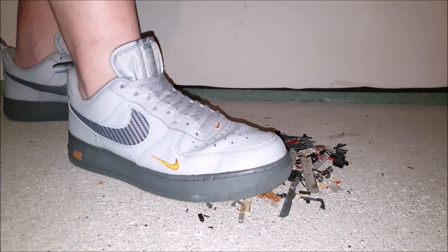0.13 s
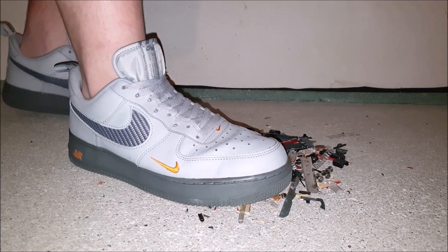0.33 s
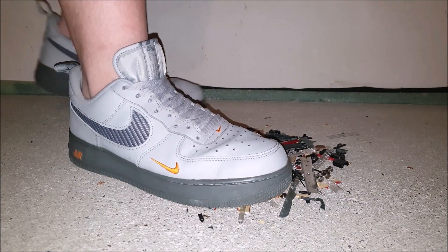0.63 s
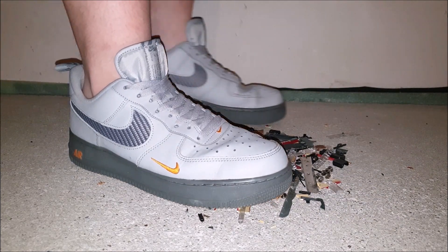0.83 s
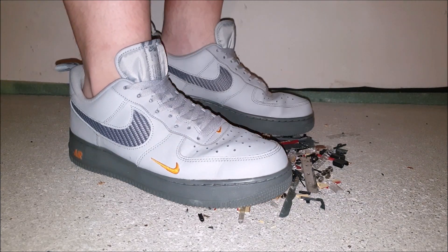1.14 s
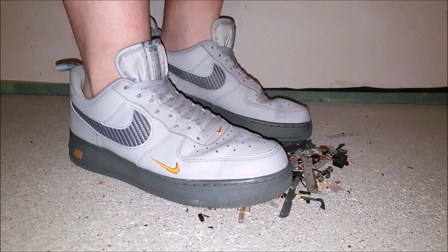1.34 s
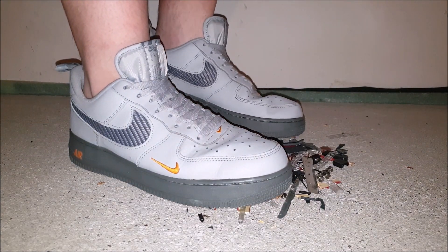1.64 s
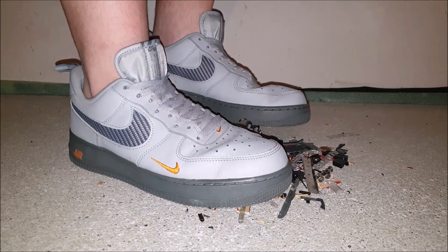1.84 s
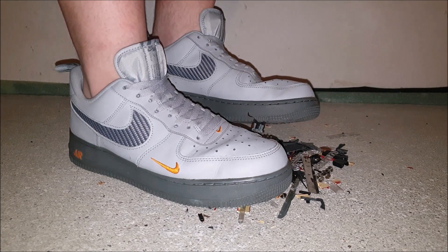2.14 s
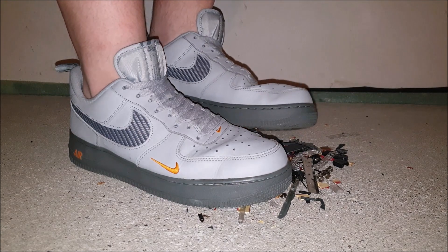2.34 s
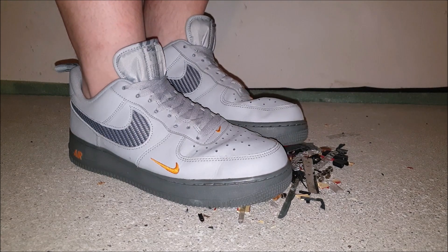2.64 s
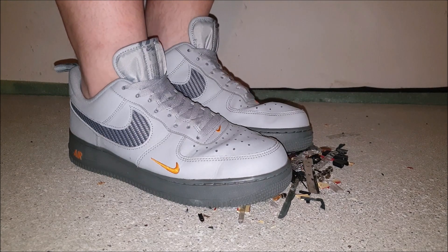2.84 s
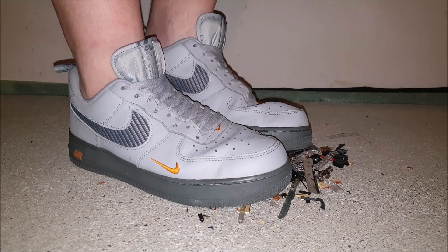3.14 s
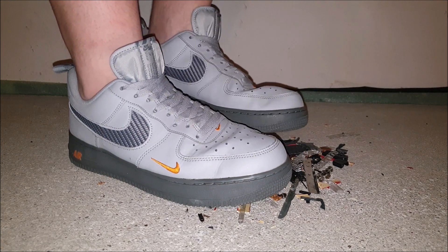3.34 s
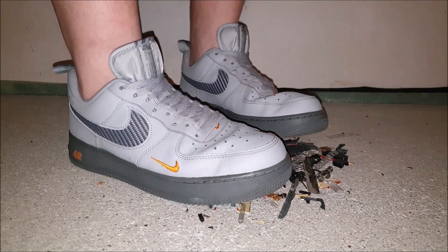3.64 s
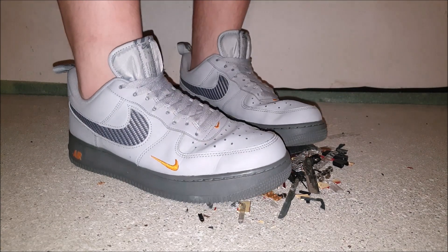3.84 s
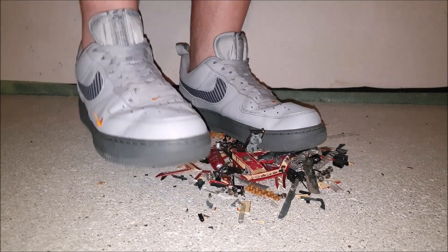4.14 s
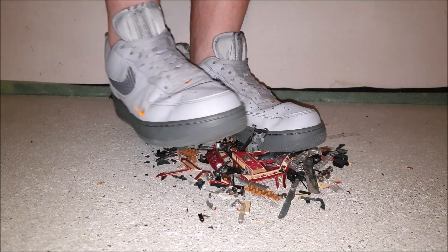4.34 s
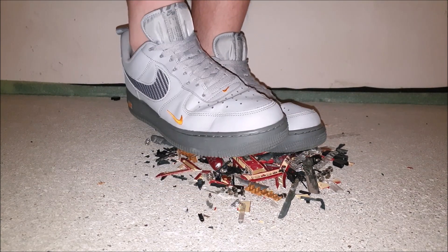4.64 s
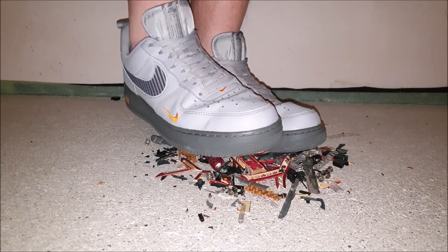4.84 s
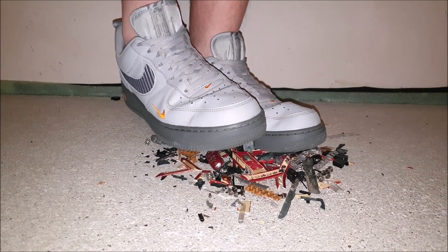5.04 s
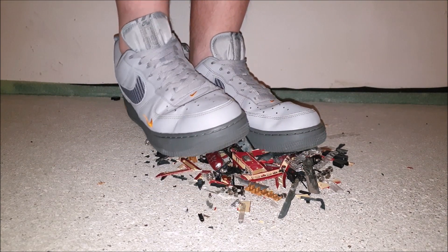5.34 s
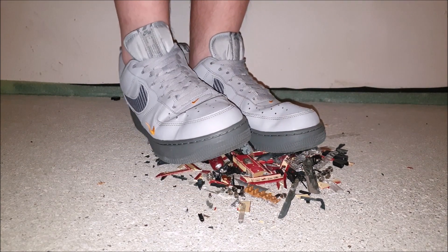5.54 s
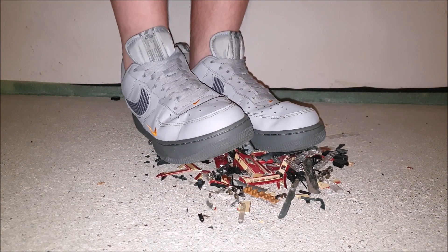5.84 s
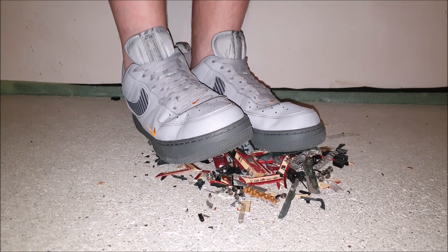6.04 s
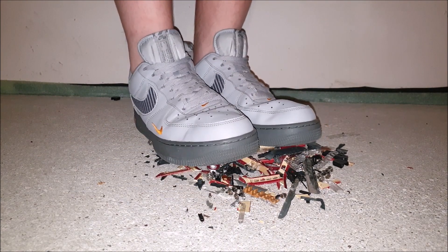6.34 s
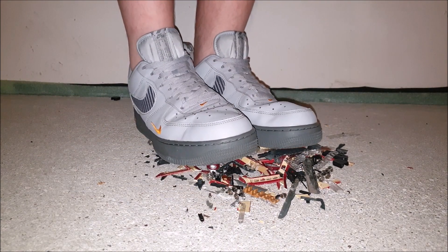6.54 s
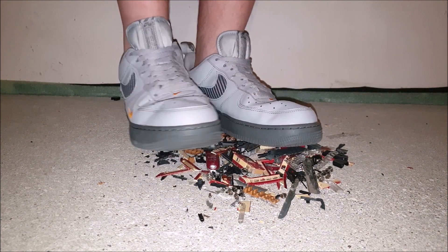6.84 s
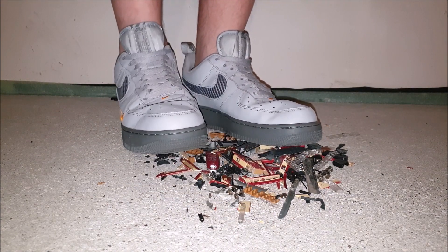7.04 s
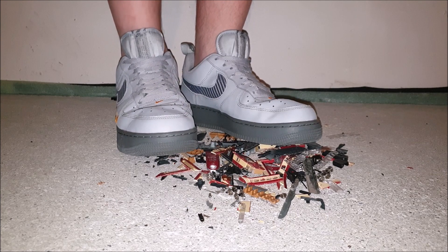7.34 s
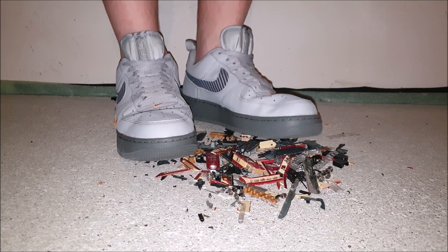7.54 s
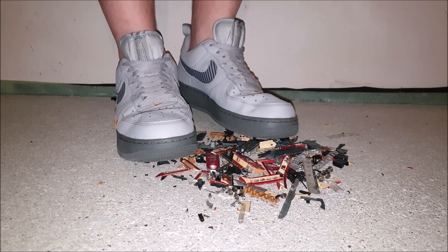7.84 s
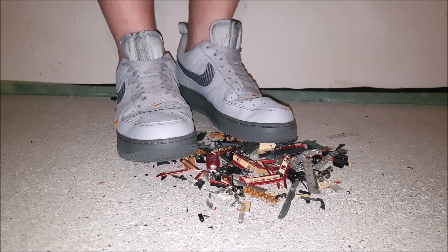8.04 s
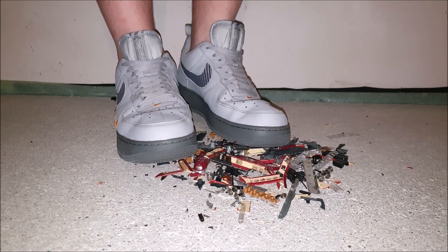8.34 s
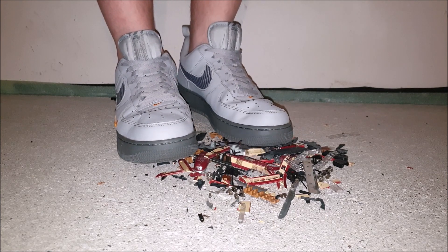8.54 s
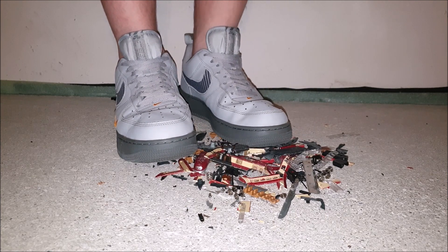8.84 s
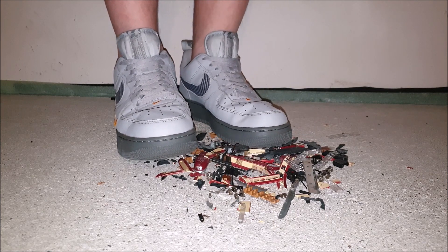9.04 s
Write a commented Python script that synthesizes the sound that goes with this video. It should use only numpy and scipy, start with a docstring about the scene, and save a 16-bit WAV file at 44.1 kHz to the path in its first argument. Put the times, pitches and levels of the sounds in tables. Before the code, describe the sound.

A close stereo microphone hears shoes treading on broken hard plastic in a small bare room. A soft thud opens, then a loud, bright snap at 0.3 seconds. At 0.9 a hollow piece clacks and chatters, leading into crackles and a dense, strong crunch near 1.35 with a low floor thud. Sharp cracks cluster at 1.8 to 2.0, then scattered snaps continue to 3.3. After a lull, a hard double crack comes at 4.05, followed by faint ticks. Snaps gather again from 5.3 to 5.7. The heaviest later burst, cracks, crunching and a booming thud together, lands around 6.2. From 6.9 to 7.9 only tiny clicks and creaks remain. Gritty crunches return at 8.1 to 8.6, and a few clear snaps finish around 9.0 to 9.15. Brief echoes follow each crack, over faint rumble and hiss slightly toward the left.

```python
"""Plastic pieces snap and splinters crunch under the sneakers of a person treading on a broken heap, heard close up.
Every fracture, large or tiny, has three parts: the dull knock of a bending piece, its bright ring, the fine tick of the tear.
Snaps are single fractures; crunching is a stream of tiny ones as the sole presses and twists; a hollow piece clacks once.
Under them the weight thuds on the hard floor, as noisy pushes set low tones booming.
A small bare room answers with echoes, over faint rumble and hiss."""
import sys
import numpy as np
from scipy import signal
from scipy.fft import rfft, irfft, next_fast_len
from scipy.io import wavfile

SR = 44100
rng = np.random.default_rng(int(sys.argv[2]) if len(sys.argv) > 2 else 0)


def pcm_store(signal):
    """Save signal as 16-bit PCM."""
    levels = np.round(np.clip(np.atleast_2d(signal), -1, 1) * 32767)
    wavfile.write(sys.argv[1], SR, levels.astype(np.int16).T)


N = 405279  # length in samples
HZ = np.fft.rfftfreq(1024, 1 / SR)  # frequencies at which the sound of a piece is shaped


def amp(db):
    """Turns decibels into a gain."""
    return 10 ** (np.asarray(db) / 20)


def unit(x):
    """Scales a sound to energy 1, averaged over its channels."""
    return x / np.sqrt(np.mean(np.sum(x ** 2, axis=-1)) + 1e-20)


def read(points, hz):
    """Reads a table between its points, with frequency on a logarithmic axis."""
    f, value = np.transpose(points)
    return np.interp(np.log(hz + 1), np.log(f + 1), value)


def add(mix, s, sound):
    """Mixes a sound in at time s, in seconds."""
    part = mix[..., max(round(s * SR), 0):][..., :sound.shape[-1]]
    part += sound[..., :part.shape[-1]]


def colour(x, gain):
    """Filters a sound by a gain that is a function of frequency."""
    size = next_fast_len(x.shape[-1] + 4096)
    spectrum = rfft(x, size) * gain(np.fft.rfftfreq(size, 1 / SR))
    return irfft(spectrum, size)[..., :x.shape[-1]]


def pan(db):
    """Left and right gains that differ by db and keep the total power the same."""
    return np.array([amp(db), np.ones_like(db)]) / np.sqrt((1 + amp(db) ** 2) / 2)


def snaps(spots, run_s=.0014, after=0.27, scatter_db=9.5):
    """A crack runs through a piece in one big jump and small ones; returns sound at the ports and into the room."""
    # Pieces that break. Each row: start in seconds, ring energy in dB, knock in dB above the ring,
    # tick in dB above the ring, knock frequency in Hz, extra dB straight at the microphone.
    breaks = [(0.033, -36, 5, -15, 239, -1.5), (0.2817, 8.5, -16, -0.5, 845, -0.5),
              (0.904, -10, -12, -5.5, 403, 0), (0.994, -15.5, 1, -2, 317, -2.5),
              (1.086, -4.5, -8, 0, 1515, -5.5), (1.346, -7.5, -0.5, 15, 1350, -0.5),
              (1.391, -8.5, -14, 0, 793, 7), (1.717, -21, -18, -16, 790, 1.5),
              (1.795, -9.5, -25.5, -9.5, 343, 6), (1.817, -3.5, -13.5, -10.5, 343.7, 4.5),
              (1.9983, 7.5, -18.5, -7, 803, 1), (2.005, 10.5, -34.5, -17, 800, 0.5),
              (2.2106, -13, -34, -10.5, 800, 2.5), (2.284, -14, -29, -14, 800, 2.5),
              (2.3706, -4.5, -15, -5, 787, -1.5), (2.455, 2.5, -14.5, -4.5, 801, 2),
              (2.500, -6, -14, -5.5, 793, 5), (2.564, -2.5, -7, 3, 520, -2.5), (2.744, -8, -3, -4, 720, -1),
              (2.7916, -6, -15, 6, 400, 3.5), (2.834, 4, -12, 2.5, 493, 1.5),
              (2.837, -0.5, -12, 7, 552, 12), (3.0366, -4.5, -8.5, -4.5, 440, 3),
              (3.169, -13, -36, 0.5, 800, -2), (3.294, -4.5, -15.5, -4, 1190, 0),
              (3.539, -34.5, 1, -7, 545, 3), (3.631, -25.5, -28, -3, 800, 2.5),
              (3.889, -16.5, -8, -5.5, 329.5, 6), (3.991, -27.5, 6.5, -7, 1400, 7),
              (4.047, 7, -14, -11.5, 480, 4), (4.056, 1, -7.5, 2.5, 487, 3.5),
              (4.245, -11.5, -36, 11, 950, 1), (4.416, -11.5, -11.5, -3.5, 394, 1.5),
              (4.494, -19.5, -6.5, -2.5, 404, 6.5), (4.611, -31, -28, -1.5, 800, 0),
              (4.864, -31, 2, 7, 1190, -0.5), (4.927, -28, -12, 2, 1100, 5),
              (5.047, -24.5, -15.5, 2, 1990, 2.5), (5.248, -18.5, -27.5, -18, 794, -2.5),
              (5.2635, -9.5, -28, 0, 796, 1.5), (5.2944, -21, -18.5, 2, 1260, 8),
              (5.355, -5.5, -14, 6, 529.6, 1.5), (5.3915, -2, -20.5, -11.5, 339, 4.5),
              (5.626, -7, -4, 2, 840, 2), (5.653, -0.5, -13.5, 4, 1416, 6),
              (5.6725, 2, -11, -2.5, 797.5, 4), (5.9124, -29.5, -14.5, 7.5, 700, 11.5),
              (6.1365, -14, -1.5, 6, 1376, 1.5), (6.165, -1, -3, 5, 797, -2.5),
              (6.2113, 7.5, -7.5, 6.5, 855, -2), (6.221, 6.5, -9.5, -12, 850, 4),
              (6.2336, -3.5, 0.5, -3, 905, 9.5), (6.28, -3, -16.5, 7, 702, 1),
              (6.3604, -21.5, 4, -4.5, 770, 11.5), (6.432, -9.5, -12, 2.5, 760, 5.5),
              (6.6933, -15.5, -12, 4, 860, 1), (6.917, -29.5, -19, -5, 803, 5.5),
              (7.290, -36.5, 4, 2.5, 797, 0.5), (7.473, -32.5, -13, -7, 1400, 4.5),
              (7.5015, -23.5, -24, -4, 800, 2), (7.621, -28.5, -16, -11, 798, -1),
              (8.060, -14, -9.5, -9, 697, -4), (8.1506, -9, -4.5, 3, 810, 0),
              (8.297, -9.5, -8.5, -18, 776, 4), (8.463, -23, -13, 2, 800, 1.5),
              (8.5925, -15, 3, -14, 1450, 6.5), (8.887, -27.5, -14, -10, 330, -4),
              (9.007, 0, -11.5, -19, 1480, 5), (9.058, -2.5, -24.5, 0.5, 830, 6),
              (9.149, -7.5, -12, -5.5, 440, 2)]
    near, around = np.zeros((2, N)), np.zeros((spots, 2, N))
    for k, (s, db, knock_db, tick_db, knock_hz, facing_db) in enumerate(breaks):
        jumps = np.zeros(512)
        at = np.minimum(rng.exponential(run_s, size=7) * SR, len(jumps) - 1).astype(int)
        jumps[at] = after * rng.choice([-1, 1], len(at))
        jumps[0] = 1  # the big jump
        parts = signal.fftconvolve(fracture(knock_hz, ripple_db=1.5), jumps[None, None], axes=2)
        levels_db = db + knock_db, db, db + tick_db
        sound = sum(amp(level) * unit(part) for level, part in zip(levels_db, parts))
        side = pan(scatter_db * rng.standard_normal(1))
        add(near, s, amp(facing_db) * sound * side)  # the shoe shades some pieces
        add(around[k % spots], s, sound)
    return near, around


def fracture(knock_hz, ripple_db, knock_peak_db=5.5, ring_peak_db=-3.0, tick_peak_db=2.5):
    """One breaking piece bends, rings and tears: returns knock, ring and tick, each of energy 1."""
    # Spectra of the three parts. Each row: frequency in Hz, relative level in dB.
    knock_spectrum = [(45, -21), (120, -4), (260, -2.5), (500, 0.5), (830, -1.5), (1050, -5), (1500, -1.5),
                      (2200, -8), (3500, -41.5)]
    ring_spectrum = [(1200, -43), (2300, -15.5), (3200, -8), (4200, -4), (6400, 3), (7300, -7),
                     (8400, -14.5), (12000, -45)]
    tick_spectrum = [(6500, -33.5), (8500, -9), (10000, -2.5), (11600, -0.5), (13500, -2), (15500, -6.5),
                     (16500, -17.5)]
    ring_hz, tick_hz = rng.uniform(5800, 9600), rng.uniform(10500, 14000)
    knock = shard(knock_spectrum, knock_hz, knock_peak_db, ripple_db)
    ring = shard(ring_spectrum, ring_hz, ring_peak_db, ripple_db)
    tick = shard(tick_spectrum, tick_hz, tick_peak_db, ripple_db)
    return np.array([knock, ring, tick])


def shard(spectrum, hz, peak_db, ripple_db, width=0.2, apart_db=2.0):
    """An odd-shaped piece, struck once, has a main peak or dip among chance resonances, unlike on each side."""
    chance = signal.fftconvolve(rng.standard_normal((3, len(HZ))), unit(np.hanning(15))[None], "same")
    main = np.exp(-.5 * (np.log((HZ + 1) / hz) / width) ** 2)
    shared_db = read(spectrum, HZ) + peak_db * main + ripple_db * chance[0]
    db = shared_db + apart_db * chance[1:]
    # minimum phase: sudden start, short ring
    log_gain = irfft(np.log(amp(db)))
    log_gain[:, 1:512] *= 2
    log_gain[:, 513:] = 0
    return unit(irfft(np.exp(rfft(log_gain))))


def crunch(spots, per_s=190, crowding=.6, spread_db=6.0, level_db=0.0, ripple_db=5.0):
    """Many tiny fractures; harder grinding makes them both more frequent and larger."""
    db, knock_db, tick_db = grinding()
    rate = np.minimum(per_s * amp(crowding * (db + 50)), 3000)  # fractures per second; per_s holds at -50 dB
    pieces = [fracture(250 * 7 ** rng.random(), ripple_db) for _ in range(48)]
    sizes = amp(spread_db * np.clip(rng.standard_normal(N), -2, 2))
    # crowded grains are scaled down so that the total power follows the grinding level
    sizes *= amp(level_db) * np.sqrt(SR / rate / np.mean(sizes ** 2))
    sizes *= rng.choice([-1, 1], N)
    which = rng.integers(0, len(pieces), N)
    side_db = 3 * rng.standard_normal(N)
    out = np.zeros((spots, 2, N))
    for i in np.flatnonzero(rng.random(N) < rate / SR):
        knock, ring, tick = pieces[which[i]]
        grain = amp(knock_db[i]) * knock + amp(db[i]) * ring + amp(tick_db[i]) * tick
        add(out[which[i] % spots], i / SR, sizes[i] * grain * pan(side_db[i:i + 1]))
    return out


def grinding(range_db=31, rest_db=-92, jerk_s=.018, jerk_db=3.5):
    """The sole's force swells and lets go in small jerks; returns dB levels of ring, knock and tick over time."""
    # The sole presses or twists on the splinters. Each row: time of greatest force in seconds, ring level in dB,
    # build time in seconds, release time in seconds, knock in dB above the ring, tick in dB above the ring.
    efforts = [(1.00, -45, 0.057, 0.21, -10.5, 0), (1.088, -31, 0.076, 0.043, -17.5, 1),
               (1.36, -18.5, 0.11, 0.072, -12, -1.5), (1.54, -50, .03, .11, -2.5, -4),
               (1.82, -42.5, 0.062, .07, -7, -0.5), (2.018, -34, 0.14, .08, -11, -4),
               (2.375, -36, 0.054, 0.15, -17.5, -7), (2.58, -47, 0.3, 0.15, -12, -0.5),
               (2.74, -45.5, 0.35, 0.65, -16, -5), (3.31, -43.5, 0.21, 0.17, -8.5, -4.5),
               (3.82, -55, 0.14, .6, -7.5, -4), (4.06, -45, 0.4, 0.46, -6, -2),
               (4.328, -49.5, 0.21, 0.27, -15.5, -10), (5.632, -45.5, 0.3, 0.67, 0.5, 3),
               (5.89, -48.5, 0.12, .08, -17, -1.5), (6.222, -22.5, 0.077, 0.053, -4, 1),
               (6.351, -34.5, 0.1, 0.055, -0.5, 0.5), (6.62, -55, 0.08, 0.076, -1, 5),
               (6.73, -49, 0.043, 0.093, -5, -5), (7.53, -59.5, .14, 0.25, -11.5, -6),
               (8.08, -45, 0.075, 0.29, -6, -0.5), (8.198, -31.5, 0.12, 0.093, -7.5, 0),
               (8.32, -31.5, .045, 0.065, -4, 1), (8.603, -29, 0.041, .11, -12, -4),
               (9.03, -50.5, 0.066, 0.29, 3, 4)]
    t = np.arange(0, N, 64) / SR
    power = amp(rest_db) ** 2  # the heap still creaks faintly under the standing foot
    for s, db, build_s, release_s, knock_db, tick_db in efforts:
        # a press gains range_db over its build time and loses it over its release time
        away = np.maximum((s - t) / build_s, (t - s) / release_s)
        parts_db = np.array([[0], [knock_db], [tick_db]])
        power = power + amp(db - range_db * away + parts_db) ** 2
    # the heap gives way in jerks of about this length and depth
    jerks = jerk_db * np.interp(t, jerk_s * np.arange(len(t)), rng.standard_normal(len(t)))
    return [np.interp(np.arange(N) / SR, t, 10 * np.log10(part) + jerks) for part in power]


def clack(s=.9015, energy_db=-3.5, chatter_s=0.012, chatter=0.19):
    """A large hollow piece tips, strikes the floor and chatters briefly, ringing at its own tones."""
    # Tones of the hollow piece. Each row: frequency in Hz, width in Hz (wider dies sooner), relative level in dB.
    tones = [(1300, 57, -0.5), (1560, 180, 12), (1800, 140, -13.5), (2620, 160, 2.5)]
    out, t = np.zeros((2, N)), np.arange(3000) / SR
    body = np.zeros(len(t))
    for hz, width, db in tones:
        body += amp(db) * np.sqrt(width) * np.exp(-np.pi * width * t) * np.sin(2 * np.pi * hz * t)
    blows = chatter * rng.standard_normal(len(t)) * np.exp(-t / chatter_s)
    blows[0] = 1  # the first strike
    add(out, s, amp(energy_db) * unit(signal.fftconvolve(blows, body)))
    return out


def treads(level_db=4.0, push_s=0.096):
    """The sole settles in an uneven push that sets the low modes of floor and room booming."""
    # Weight landing on the floor. Each row: start in seconds, peak level in dB before level_db is added.
    landings = [(0.009, -46), (0.986, -47.5), (1.279, -39), (1.349, -41), (2.381, -44.5), (2.549, -50),
                (2.822, -51.5), (3.045, -54), (3.727, -46.5), (4.041, -46), (4.406, -55), (5.36, -54),
                (5.631, -45), (6.158, -35), (6.221, -36), (6.868, -54), (7.328, -61), (8.065, -47.5),
                (8.138, -39.5), (8.621, -51.5), (9.009, -56)]
    # Boom of floor and room. Each row: frequency in Hz, width in Hz (wider dies sooner), relative level in dB.
    modes = [(54, 14, -18.5), (67, 4.5, 3), (84.4, 7, 5), (134, 45, -7.5), (214.8, 2.7, -6),
             (288.3, 110, -17.5)]
    out, t = np.zeros(N), np.arange(SR // 2) / SR
    boom = np.zeros(len(t))
    for hz, width, db in modes:
        boom += amp(db) * width * np.exp(-np.pi * width * t) * np.sin(2 * np.pi * hz * t)
    for s, db in landings:
        push = rng.standard_normal(len(t)) * np.sin(np.pi * np.sqrt(np.minimum(t / push_s, 1)))
        thud = signal.fftconvolve(push, boom)
        add(out, s, amp(db + level_db) * thud / abs(thud).max())
    return out


def room(x, build_s=0.0021, early=1.8):
    """The echoes of one spot: a few strong ones from floor and wall, then a dense tail."""
    # How long the echoes last. Each row: frequency in Hz, time to fall by 60 dB in seconds.
    fall_times = [(140, 0.12), (215, 0.64), (340, 0.36), (620, 0.42), (800, 0.4), (1050, 0.34),
                  (5500, 0.36), (11000, 0.29), (16000, 0.26)]
    # How strong the echoes are. Each row: frequency in Hz, echo level in dB.
    echo_levels = [(130, -3.5), (230, -1.5), (450, -6), (800, -2.5), (1500, -4), (5000, -4.5), (12000, -3)]
    # How alike the echoes are on both sides. Each row: frequency in Hz, left-right likeness (1 = the same).
    likeness = [(200, 1), (600, 0), (1200, 0.073), (2500, 0.45), (5000, 0)]
    size = 30000
    taps = rng.standard_normal((2, size)) * (rng.random((2, size)) < .25)
    taps[:, rng.integers(150, 1900, size=8)] += early * rng.choice([-1, 1], size=8)
    taps *= 1 - np.exp(-np.arange(size) / SR / build_s)
    hz, t, (left, other) = signal.stft(taps, SR, nperseg=512)
    same = np.clip(read(likeness, hz), -1, 1)[:, None]
    right = same * left + np.sqrt(1 - same ** 2) * other
    decay = amp(-60 * t / read(fall_times, hz)[:, None])  # bands that ring longer also gather more energy
    tail = unit(signal.istft(np.array([left, right]) * decay, SR, nperseg=512)[1])
    echoes = colour(tail, lambda f: amp(read(echo_levels, f)))
    return signal.oaconvolve(x, echoes, axes=1)[:, :N]


def hiss(level_db=-67):
    """Faint room rumble and microphone hiss: steady noise, stronger on the left."""
    # Spectrum of the background. Each row: frequency in Hz, relative level in dB per Hz.
    noise_spectrum = [(20, -33.5), (45, -9), (80, -2.5), (150, -16.5), (450, -20), (3000, -23.5),
                      (4900, -15.5), (6300, -12), (7900, -36), (9500, -34.5), (12600, -27.5), (14800, -10),
                      (15700, -7.5), (16300, -16.5)]
    # Balance of the background. Each row: frequency in Hz, left minus right in dB.
    balance = [(60, 3.2), (400, 1), (2400, 5), (4400, 14), (15000, 15)]
    noise = rng.standard_normal((2, N))
    noise = colour(noise, lambda f: amp(read(noise_spectrum, f)) * pan(read(balance, f)))
    return amp(level_db) * np.sqrt(N) * unit(noise)


def scene(direct_db=-5.5, shaded_db=-4.5):
    """Fractures at a few spots under the sole, each with its own echoes, over the thuds of the feet."""
    spots = 4
    near, around = snaps(spots)
    under = crunch(spots)
    under[0] += clack()
    direct = amp(direct_db) * near + amp(shaded_db) * under.sum(0)
    echoes = sum(room(x) for x in around + under)
    return direct + echoes + treads()


def record(dry, low_cut_hz=55, ceiling=0.84, edge_hz=16050):
    """Two microphone ports cut deep bass and colour each side; then hiss, soft overload and a treble limit."""
    # Balance of the two ports. Each row: frequency in Hz, left minus right in dB.
    port_balance = [(60, 8), (400, 8), (2400, 9), (4400, 10.5), (6500, 12.5), (8500, 1), (11000, -1),
                    (13000, -3.5), (15500, 0)]
    # Timing of the two ports. Each row: frequency in Hz, radians by which left leads.
    port_lead = [(4400, 0.5), (6700, -0.14), (8500, -3.5), (11500, -6), (15500, -4.5)]

    def ports(f):
        """Gain and phase of the left and right port."""
        bass = (f / low_cut_hz) ** 4 / np.sqrt(1 + (f / low_cut_hz) ** 8)
        turn = np.exp(.5j * np.outer([1, -1], read(port_lead, f)))
        return bass * pan(read(port_balance, f)) * turn

    heard = colour(dry, ports) + hiss()
    heard = ceiling * np.tanh(heard / ceiling)  # rounds off the loudest peaks
    treble_limit = signal.firwin(401, edge_hz, window=("kaiser", 8), fs=SR)
    return signal.oaconvolve(heard, treble_limit[None], "same")


dry = scene()
out = record(dry)
pcm_store(out)
```